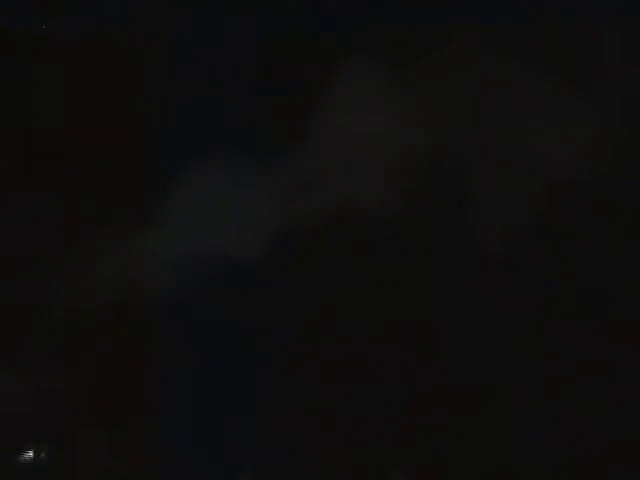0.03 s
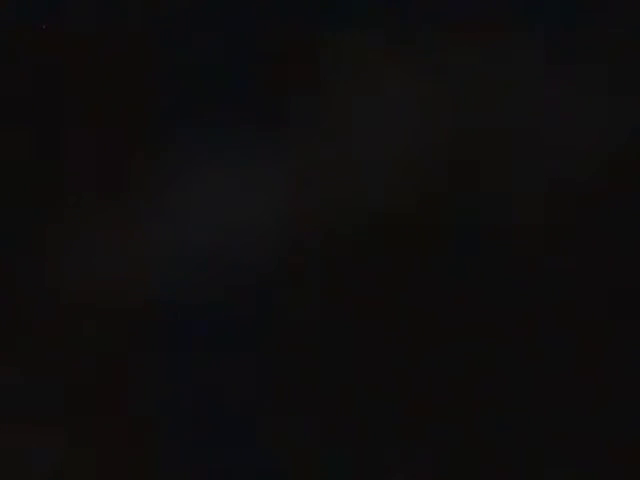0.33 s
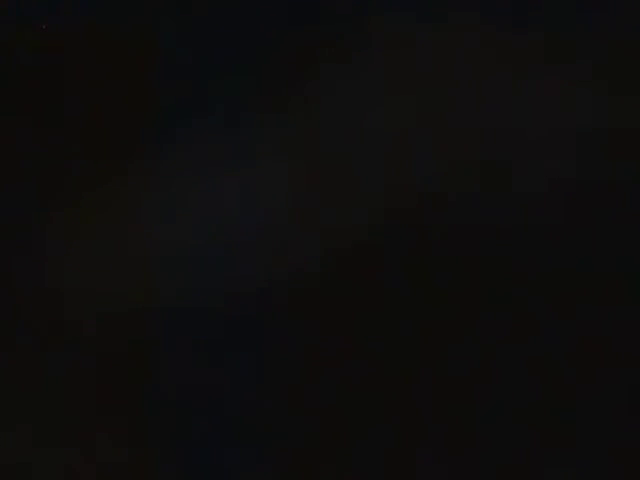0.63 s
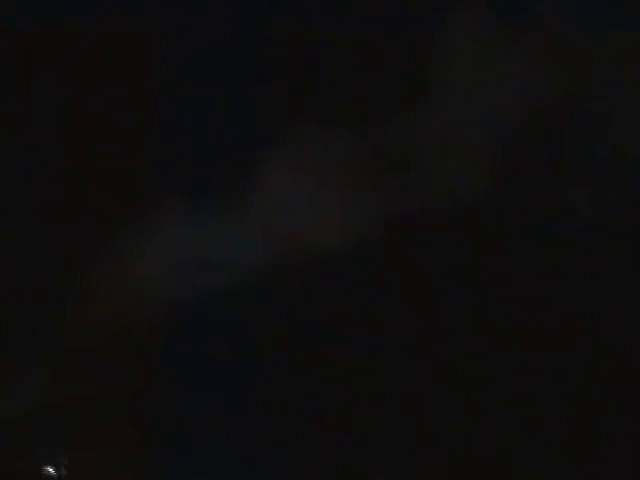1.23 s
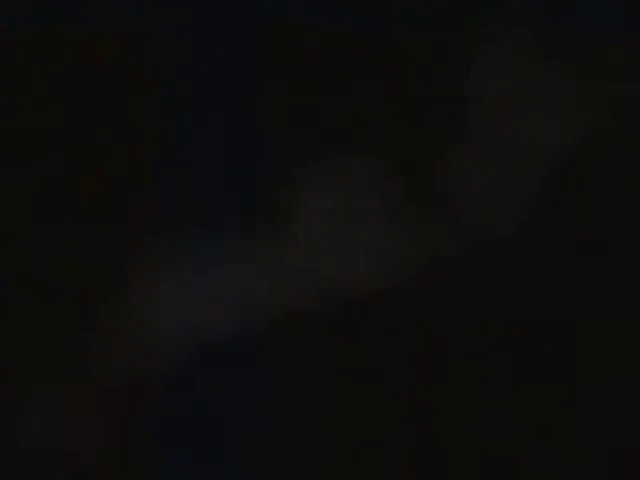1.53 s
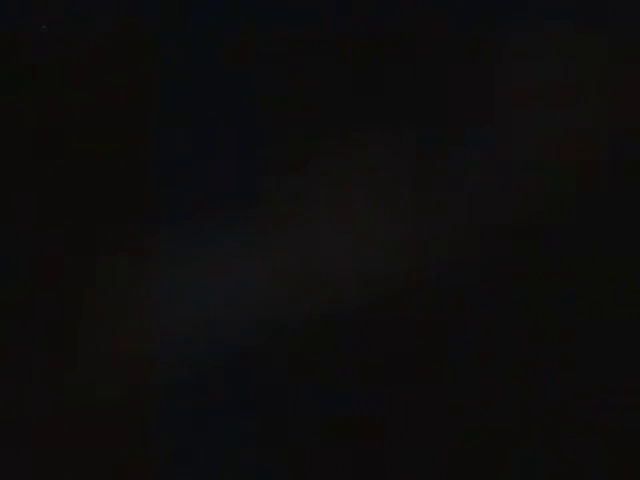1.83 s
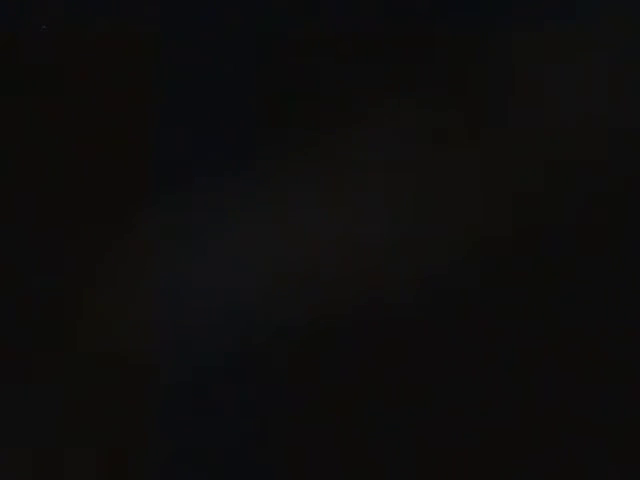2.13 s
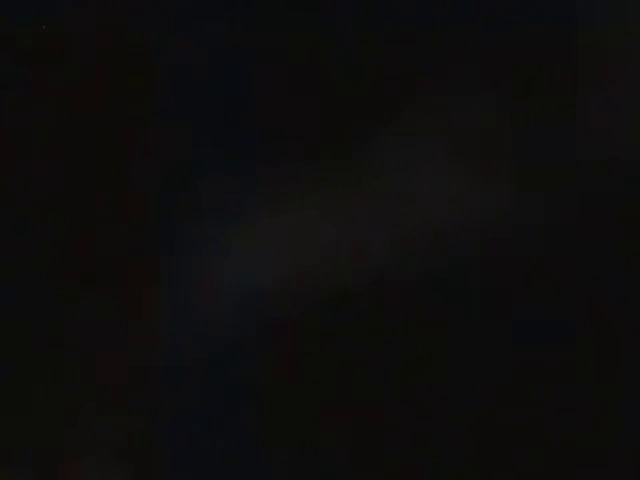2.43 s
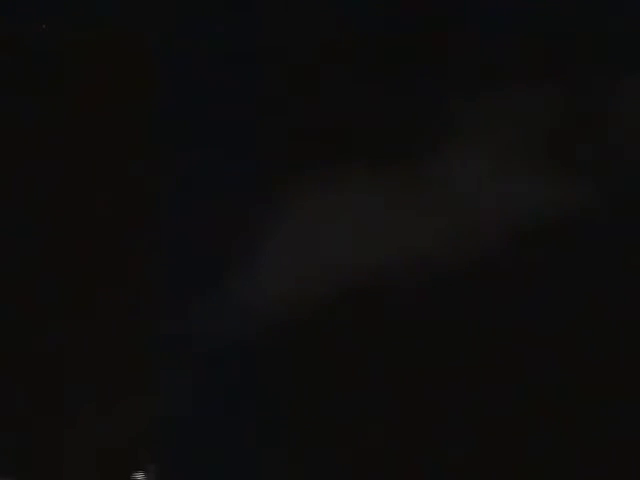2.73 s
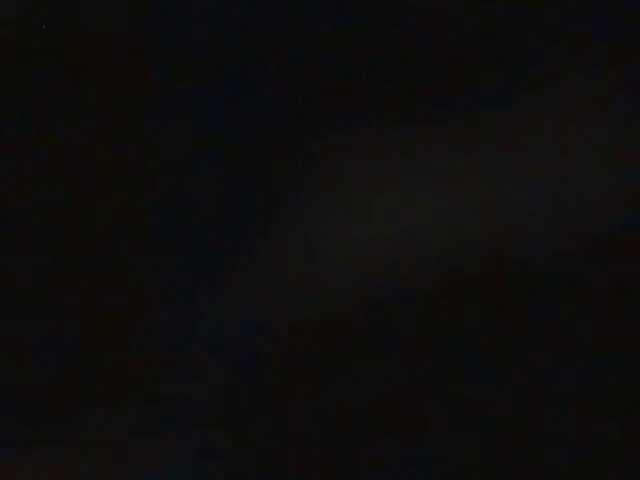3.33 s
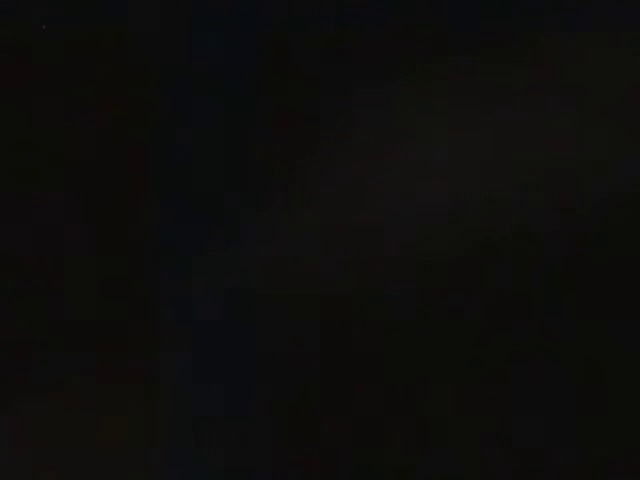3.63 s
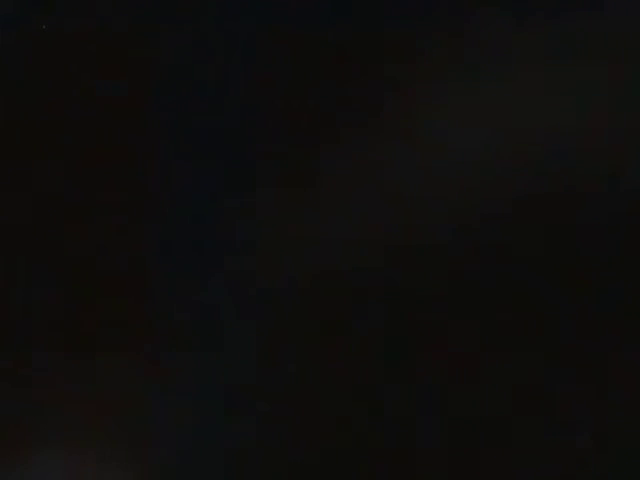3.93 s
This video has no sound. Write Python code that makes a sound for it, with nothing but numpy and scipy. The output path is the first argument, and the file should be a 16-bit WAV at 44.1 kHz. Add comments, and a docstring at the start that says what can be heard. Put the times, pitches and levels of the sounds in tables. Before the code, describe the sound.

A large industrial fan drones some way off outdoors, a strong low hum over a soft rush of air. It wavers and dips briefly, while a breeze rumbles on the microphone and three tiny ticks sound on the right.

```python
"""Kiln fan at night

A large kiln fan drones outdoors, some way off: a strong blade tone, weaker machine lines and a rush
of turbulent air. The whole drone wavers and dips briefly, most deeply during a gust. A breeze rumbles
on the microphone, mostly on the right port, and three tiny ticks sound on that side over a thin hiss."""
import sys
import numpy as np
from scipy import signal
from scipy.fft import rfft, irfft
from scipy.io import wavfile
from scipy.ndimage import uniform_filter1d, minimum_filter1d

SR = 44100
rng = np.random.default_rng(int(sys.argv[2]) if len(sys.argv) > 2 else 0)


def generate_wav(signal):
    """Clip the signal to [-1, 1] and save it as 16-bit WAV at the path in sys.argv[1]."""
    frames = np.transpose(np.atleast_2d(signal))
    scaled = np.clip(frames, -1, 1) * 32767
    pcm = np.round(scaled).astype(np.int16)
    wavfile.write(sys.argv[1], SR, pcm)


N = 176400
TIME = np.arange(N) / SR
WAVER_HZ = 15  # bandwidth of the quick wavering of blade tone, rush and hiss

# Swells and dips that rush and hiss each follow in part: t/s, relative level/dB
AIR_SWELL = [(0, 2.5), (.12, -2), (.27, 1), (.38, -4.5), (.45, .3), (.56, -1.5), (1.0, -0.4), (1.13, -1.5),
             (1.23, 0.3), (1.38, -0.5), (1.61, 0.5), (1.69, -2.5), (1.82, -1), (2.25, -.7), (2.47, 1.5),
             (2.76, -1.7), (3.13, 1.1), (3.27, 0), (3.6, 0.6), (3.68, 2), (3.76, -4.5), (3.87, -0.5),
             (4, 2)]


def from_db(db):
    """Amplitude ratio of a level: a factor of ten for every 20 dB."""
    return 10 ** (np.asarray(db) / 20)


def in_time(rows):
    """Linear interpolation of each column of a time curve at every sample."""
    times, *columns = np.transpose(rows)
    return np.array([np.interp(TIME, times, column) for column in columns])


def drift(corner_hz):
    """Slow random modulation: two-pole low-passed noise with unit standard deviation."""
    hop, settle = 40, 2000
    pole = np.exp(-2 * np.pi * corner_hz * hop / SR)
    white = rng.standard_normal(N // hop + settle + 2)
    slow = signal.lfilter([1], [1, -2 * pole, pole * pole], white)[settle:]
    return np.interp(np.arange(N) / hop, np.arange(len(slow)), (slow - slow.mean()) / slow.std())


def coloured(spectrum):
    """Spectral shaping of white noise to a given density, rolling off beyond the table's ends."""
    hz, db = np.transpose(spectrum)
    bin_hz = np.maximum(np.arange(N // 2 + 1) * SR / N, 1)
    density = from_db(np.interp(np.log(bin_hz), np.log(hz), db))
    roll_off = np.minimum(bin_hz / hz[0], 1) * np.minimum(hz[-1] / bin_hz, 1) ** 2
    return irfft(rfft(rng.standard_normal(N)) * density * roll_off, N) * np.sqrt(SR / 2)


def stereo(mid, side):
    """Mid-side matrix: the sum is the left channel, the difference the right."""
    return np.array([mid + side, mid - side])


def tone(hz, rms_db, waver_db=1, waver_rad=0.51, waver_hz=2.7):
    """A sinusoid under random amplitude and phase modulation."""
    phase = 2 * np.pi * (hz * TIME + rng.random()) + waver_rad * drift(waver_hz)
    return np.sqrt(2) * from_db(rms_db + waver_db * drift(waver_hz)) * np.sin(phase)


def fan_hum(blade_hz=151.23):
    """Periodic blade passage radiates harmonics; they and the machine lines waver and dip briefly."""
    # Blade tone with its brief dips: t/s, level/dB
    blade_level = [(0.03, -10.5), (0.16, -12), (0.22, -10), (0.42, -12), (0.46, -11), (1.64, -10),
                   (1.69, -14.5), (1.74, -10), (1.95, -13.5), (2.04, -8.5), (2.22, -11.5), (2.48, -9),
                   (2.77, -12), (3.03, -9), (3.61, -10), (3.82, -14.5), (3.88, -11), (3.97, -7)]
    # Fourth harmonic, fading in and out on its own: t/s, relative level/dB
    fourth_level = [(0, -46.5), (1.0, -47), (1.5, -45), (2.25, -49.5), (2.38, -38), (2.65, -47.5),
                    (2.95, -40.5), (3.25, -44.5), (3.7, -49.5), (4, -42.5)]
    # Overtones of the blade tone: harmonic number, level/dB
    overtones = [(2, -43.5), (3, -49.5)]
    # Lines of the other fans and motors: f/Hz, level/dB
    machine_lines = [(144, -33), (216.7, -46), (355.5, -50), (471.3, -53), (588.1, -49.5), (705.9, -56.5),
                     (839.8, -64.5), (959.4, -59.5), (1061, -63.5), (7853, -84), (7881, -84)]
    blade_db, = in_time(blade_level)
    fourth_db, = in_time(fourth_level)
    blade = tone(blade_hz, blade_db, waver_db=0.36, waver_rad=0.049, waver_hz=WAVER_HZ)
    fourth = tone(4 * blade_hz, fourth_db - 0.5, waver_db=0.36)
    lines = [(harmonic * blade_hz, db) for harmonic, db in overtones] + list(machine_lines)
    swing_db = blade_db - blade_db.mean()
    return blade + fourth + sum(tone(hz, db + swing_db) for hz, db in lines)


def patchy(sound, depth_db):
    """Independent amplitude modulation of seven octave-spaced bands makes the timbre flicker."""
    flickering, rest = 0, sound
    for edge_hz in 100 * 2 ** np.arange(7):
        band = signal.sosfiltfilt(signal.butter(2, edge_hz, fs=SR, output="sos"), rest)
        flickering = flickering + band * from_db(depth_db * drift(corner_hz=3.4))
        rest = rest - band
    return flickering + rest


def air_rush(swell_share=0.88, flutter_db=0.8, side_db=-22):
    """Turbulence in fan and stack radiates broadband noise, nearly the same in both channels."""
    # Spectrum of the rushing air: f/Hz, spectral density level/dB
    spectrum = [(30, -40.5), (100, -42.5), (185, -51), (280, -58), (390, -64), (470, -60), (600, -63),
                (780, -73), (930, -75.5), (1180, -75), (1500, -81.5), (2100, -84.5), (2600, -88),
                (3200, -86), (3900, -94.5), (5200, -104), (10000, -108)]
    swell_db, = in_time(AIR_SWELL)
    swing_db = swell_share * swell_db + flutter_db * drift(WAVER_HZ)
    mid = patchy(coloured(spectrum), depth_db=1.03)
    side = from_db(side_db) * coloured(spectrum)
    return from_db(swing_db) * stereo(mid, side)


def hiss(gain_db=-4, swell_share=0.73, flutter_db=2.2):
    """Faint, fluttering treble noise; it sounds wide because the channels are uncorrelated."""
    # Spectrum of the hiss: f/Hz, relative density level/dB
    spectrum = [(1000, -106), (3700, -105), (4400, -97), (7000, -99), (10300, -101.5), (11200, -107),
                (12100, -120)]
    swell_db, = in_time(AIR_SWELL)
    swing_db = swell_share * swell_db + flutter_db * drift(WAVER_HZ)
    return from_db(gain_db + swing_db) * stereo(coloured(spectrum), coloured(spectrum))


def breeze(gain_db=-1, gust_db=0.7, gust_hz=11):
    """Wind noise: local pressure fluctuations make an independent rumble at each microphone port."""
    # Spectrum of the rumble: f/Hz, relative density level/dB
    spectrum = [(10, -38), (22, -31.5), (50, -30.5), (75, -31), (120, -40.5), (185, -45.5), (280, -58),
                (400, -72.5), (600, -87), (1200, -97.5)]
    # Strength of the breeze at the ports: t/s, left level/dB, right level/dB
    port_levels = [(0, -3, -5.5), (.2, 1, -3.5), (.3, -10, 1), (.8, -9.5, 0), (1.5, -10, 0.5),
                   (1.68, -2, -1), (1.85, -12, 2), (2.4, -11.5, -2), (3.5, -10.5, -1.5), (3.76, -8.5, 3.5),
                   (4, -8, 0.5)]
    return np.array([coloured(spectrum) * from_db(gain_db + port_db + gust_db * drift(gust_hz))
                     for port_db in in_time(port_levels)])


def ticks(decay_s=0.0005, left_db=-26.5):
    """Each tick is a step with fast exponential decay; a level difference places it on the right."""
    # Ticks in the right channel: t/s, peak level/dB
    onsets = [(1.2377, -18.5), (3.5986, -22.5), (3.6782, -23.5)]
    impulses = np.zeros(N)
    for start_s, peak_db in onsets:
        impulses[int(start_s * SR)] = -from_db(peak_db)
    pole = np.exp(-1 / (decay_s * SR))
    right = signal.lfilter([1], [1, -pole], impulses + 1e-18)  # the offset prevents underflow
    return np.array([from_db(left_db) * right, right])


def scene():
    """Superposition of the fan in the middle, the wide hiss, and breeze and ticks at the microphone."""
    return fan_hum() + air_rush() + hiss() + breeze() + ticks()


def record(dry):
    """Peak limiting holds each channel to full scale; a short fade-in and a low-pass filter follow."""
    window, fade_s, cutoff_hz = 265, 0.004, 12600  # window in samples
    allowed_gain = np.minimum(1 / (np.abs(dry) + 1e-9), 1)
    gain = minimum_filter1d(allowed_gain, 2 * window + 1, axis=1)
    for _ in range(2):  # two moving averages round off attack and release
        gain = uniform_filter1d(gain, window, axis=1)
    fade_in = np.sin(np.pi / 2 * np.minimum(TIME / fade_s, 1)) ** 2
    low_pass = signal.cheby2(12, 40, cutoff_hz, fs=SR, output="sos")
    return signal.sosfiltfilt(low_pass, dry * gain * fade_in)


dry = scene()
out = record(dry)
generate_wav(out)
```